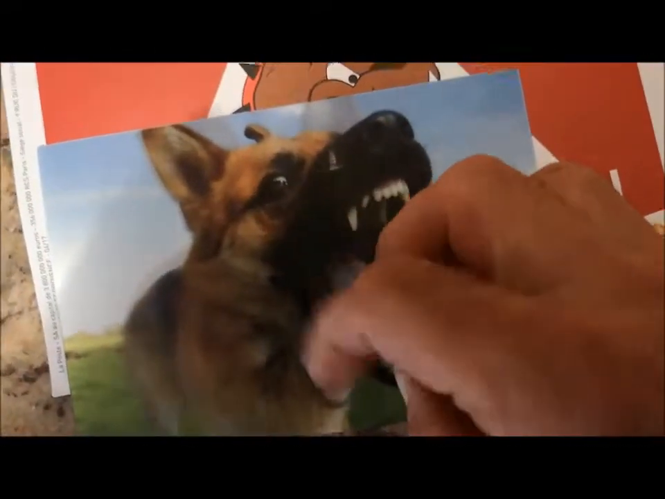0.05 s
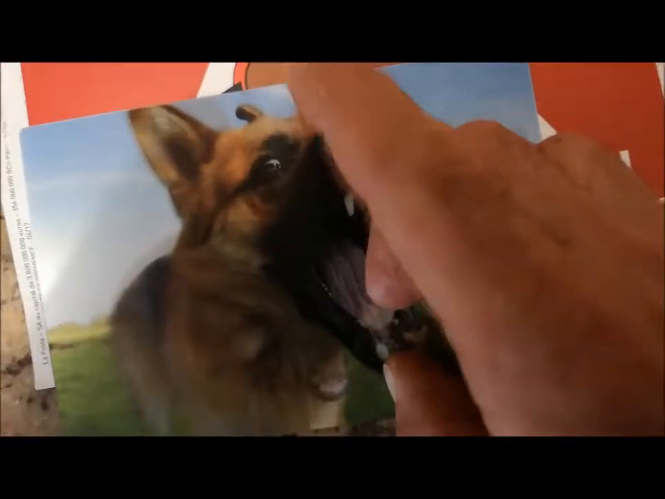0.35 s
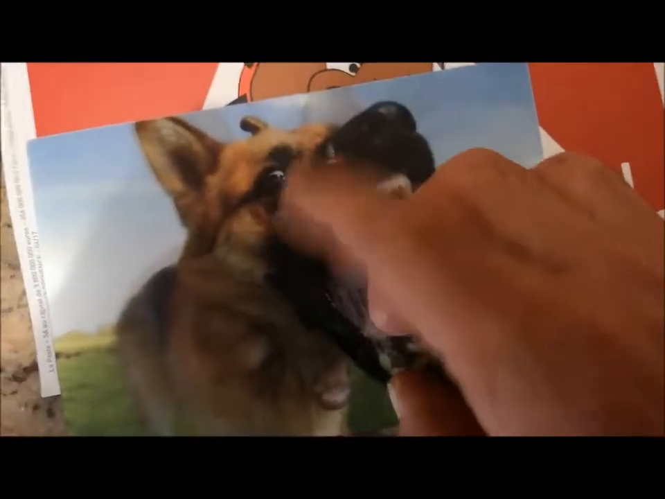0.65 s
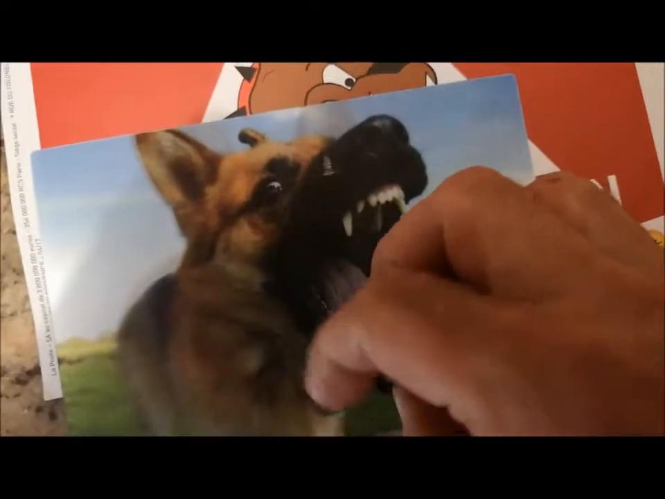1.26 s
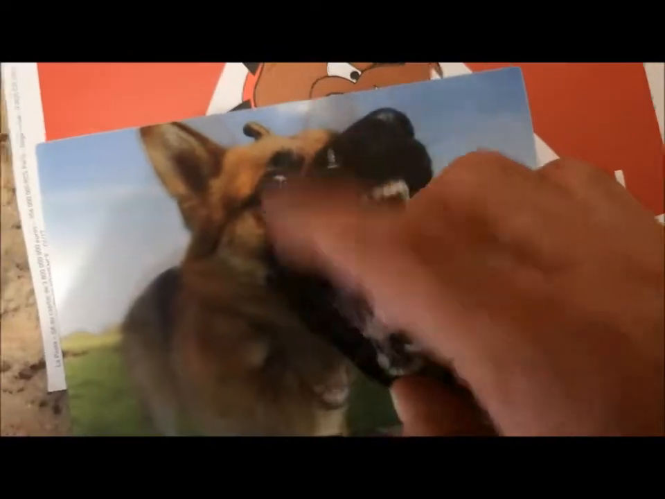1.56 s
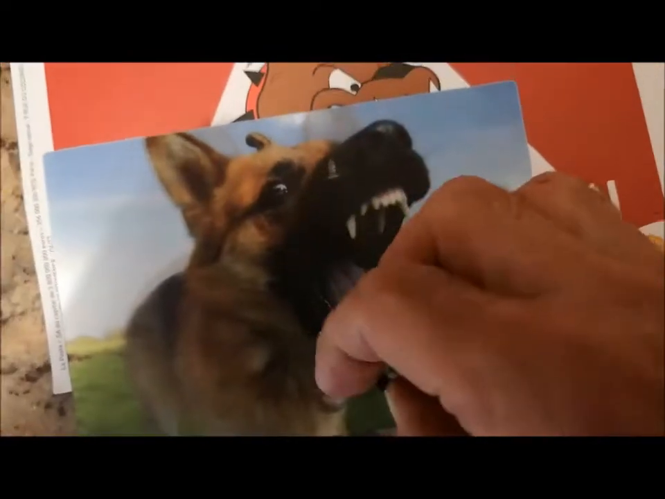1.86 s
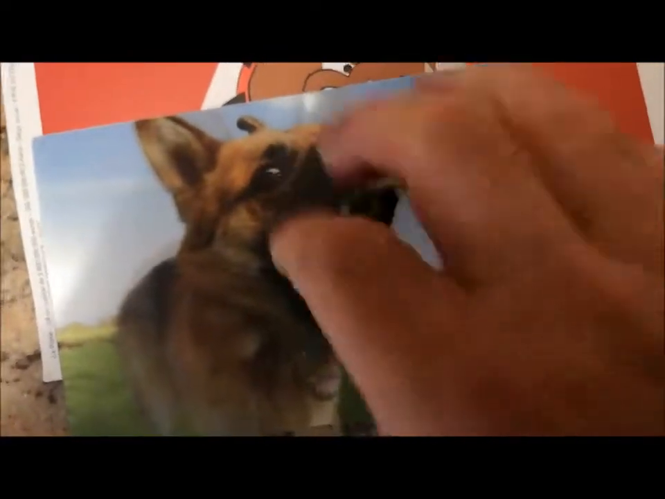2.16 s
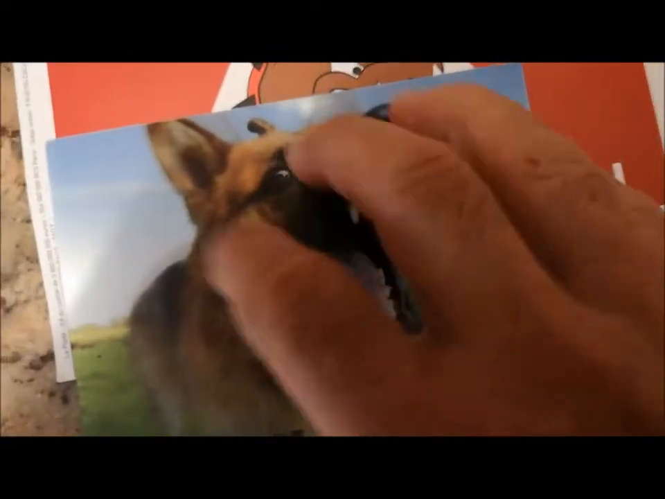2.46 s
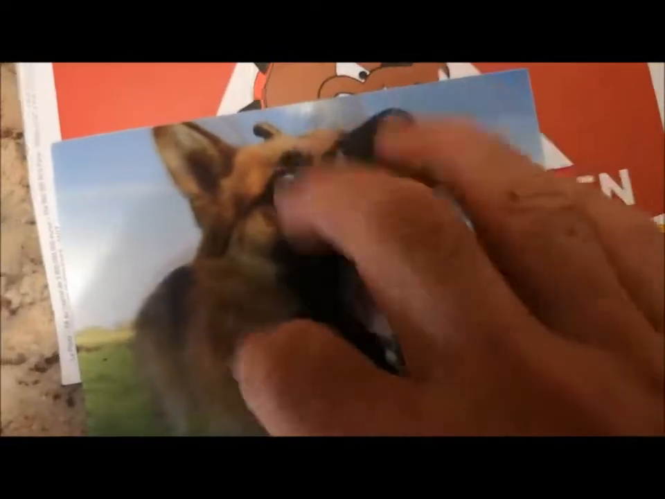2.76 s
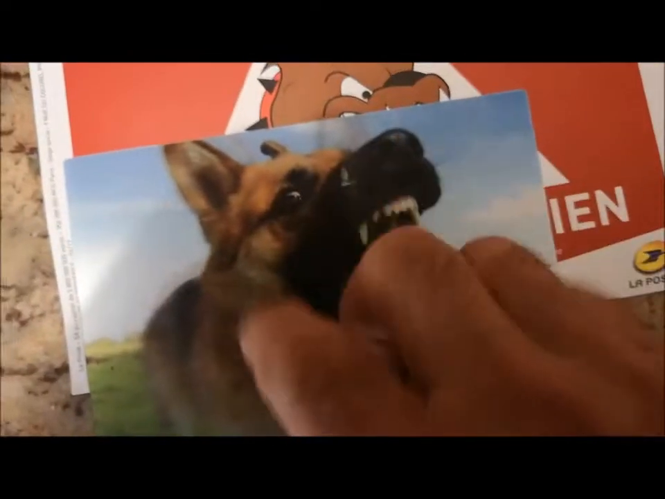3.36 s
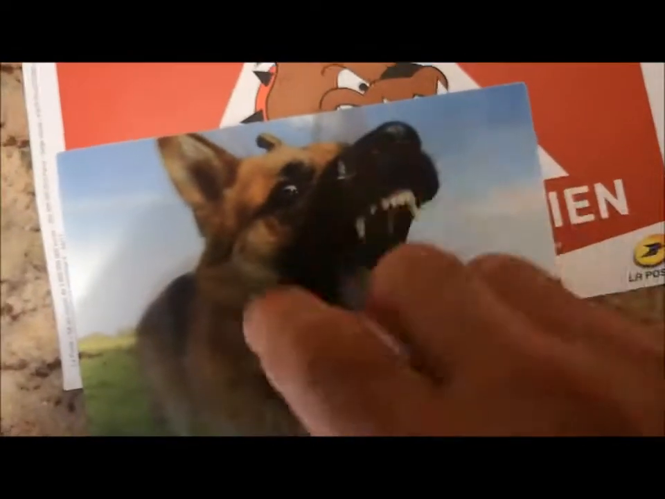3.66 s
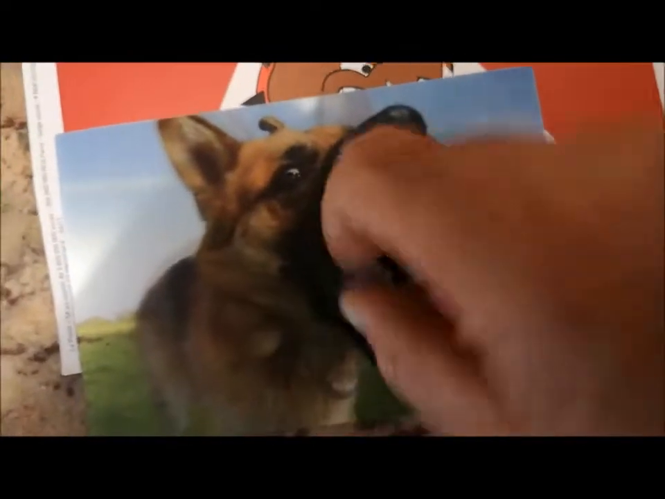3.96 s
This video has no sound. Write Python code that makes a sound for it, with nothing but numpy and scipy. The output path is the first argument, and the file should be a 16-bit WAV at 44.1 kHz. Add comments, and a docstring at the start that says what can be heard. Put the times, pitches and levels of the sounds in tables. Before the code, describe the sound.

Fingernails scratch a ribbed glossy card in quick, squeaky zips with light taps.

```python
"""Fingernails stroke a finely ribbed glossy postcard on a table, close to two microphones in a quiet room.
A nail lands with a tap and zips over the ribs. Its pitch is the number of ribs it crosses each second,
so a faster hand sounds higher. One finger scratches at first, then several claw together with more rasp.
The fingers thump the table as they land, and near the end the hand bumps it softly."""
import sys
import numpy as np
from scipy import signal
from scipy.fft import rfft, irfft, next_fast_len
from scipy.io import wavfile
from scipy.ndimage import uniform_filter1d, map_coordinates

SR = 44100
rng = np.random.default_rng(int(sys.argv[2]) if len(sys.argv) > 2 else 0)


def store_pcm(level_fs):
    """Save levels as 16-bit WAV."""
    pcm = np.round(np.clip(level_fs, -1, 1) * 32767).astype(np.int16)
    wavfile.write(sys.argv[1], SR, np.atleast_2d(pcm).T)


N = 176400  # 4 seconds
CLAW_FROM_S = 2  # one finger before this time, several after it
THUMP_RISE_S = 0.0021

# Nails landing on the card. Each row: start in seconds, level in dB.
LANDINGS = [(.036, -20), (0.4931, -19.5), (1.148, -18), (1.4559, -30.5), (1.8127, -21), (2.112, -44.5),
            (2.1338, -35), (2.2587, -33.5), (2.348, -23), (2.4286, -40), (2.4527, -30.5), (2.6, -35.5),
            (2.633, -31.5), (2.6869, -24.5), (2.9518, -28), (3.045, -24), (3.304, -29.5), (3.3491, -23),
            (3.4045, -24.5), (3.648, -21), (3.6876, -30.5), (3.9081, -27), (3.913, -14.5), (3.9165, -13.5)]
# The tone of a nail's click. Each row: frequency in Hz, level in dB.
CLICK_TONE = [(600, -33), (2400, 11.5), (4000, 5.5), (7800, 4.5), (11500, -26.5)]
# Fingertips dragging over the card. Each row: start in seconds, length in seconds, level in dB.
FINGERTIP_DRAGS = [(2.064, 0.032, -38), (2.146, 0.019, -28.5), (2.218, 0.025, -45.5), (2.258, 0.087, -38),
                   (2.405, 0.06, -39.5), (2.603, 0.098, -35), (2.739, 0.016, -28.5), (2.958, .11, -29.5),
                   (3.115, 0.019, -26), (3.312, 0.11, -34.5), (3.615, 0.095, -32), (3.772, 0.019, -25)]


def amp(db):
    """Turn decibels into a gain."""
    return 10 ** (np.asarray(db) / 20)


def fade(t, t60):
    """A fade that falls by 60 dB in t60 seconds."""
    return amp(-60 * t / t60)


def unit(x):
    """Scale a signal to an average power of 1."""
    return x / np.sqrt(np.mean(x ** 2) + 1e-20)


def along(points, hz):
    """Read between the rows of a frequency table, on a log scale."""
    freqs, values = np.transpose(points)
    return np.interp(np.log(hz + 1), np.log(freqs + 1), values)


def wobble(per_s):
    """A smooth curve through per_s random values a second."""
    return map_coordinates(rng.standard_normal(N // 8), [np.arange(N) * per_s / SR], mode="wrap")


def filtered(x, response):
    """Scale and delay each frequency as the response function says."""
    size = next_fast_len(N + SR // 2)
    return irfft(rfft(x, size) * response(np.fft.rfftfreq(size, 1 / SR)), size)[..., :N]


def coloured(x, tone, size=4096):
    """Shape a sound with a tone table, so that it rings only after each hit."""
    cepstrum = irfft(np.log(amp(along(tone, np.fft.rfftfreq(size, 1 / SR)))))
    cepstrum[1:size // 2] *= 2
    cepstrum[size // 2 + 1:] = 0
    return signal.fftconvolve(x, irfft(np.exp(rfft(cepstrum))))[:N]


def noise(tone):
    """Steady noise shaped by a tone table."""
    return unit(filtered(rng.standard_normal(N), lambda hz: amp(along(tone, hz))))


def add(track, start, sound):
    """Mix a sound into a track at a time in seconds."""
    part = track[round(start * SR):][:len(sound)]
    part += sound[:len(part)]


def pressure(drags):
    """Each drag presses down quickly, eases off and lets go."""
    t, total = np.arange(N) / SR, np.zeros(N)
    rise_s, fall_s, sag_db_per_s = 0.0086, 0.0065, 36
    for start, length, db in drags:
        press = np.clip((t - start) / rise_s, 0, 1)
        release = np.clip((start + length - t) / fall_s, 0, 1)
        total += amp(db - sag_db_per_s * np.abs(t - start)) * press * release
    return total


def room_air():
    """A faint, steady hiss, different in each microphone."""
    # The tone of the hiss. Each row: frequency in Hz, level in dB.
    hiss_tone = [(120, -13), (600, 9.5), (2500, 10), (15000, -7)]
    return amp(-72.5) * np.array([noise(hiss_tone), noise(hiss_tone)])


def nail_taps():
    """Each landing clicks and makes nail and card ring for a moment."""
    # The ringing notes. Each row: pitch in Hz, level in dB, seconds to fade by 60 dB.
    notes = [(2245, -14, 0.029), (2440, -6.5, 0.032)]
    taps, t = np.zeros(N), np.arange(SR // 20) / SR
    for start, db in LANDINGS:
        ring = sum(amp(level) * fade(t, t60) * np.sin(2 * np.pi * hz * rng.normal(1, .05) * t)
                   for hz, level, t60 in notes)
        click = amp(0.5) * fade(t, t60=0.018) * noise(CLICK_TONE)[:len(t)]
        add(taps, start, amp(db) * (ring + click))
    return taps


def table_thumps_and_rumble():
    """The table thumps and shudders as fingers land, and rumbles under the moving hand."""
    # The tone of the rumble. Each row: frequency in Hz, level in dB.
    rumble_tone = [(38, 3.5), (55, -7.5), (120, -6), (190, -17), (260, -15.5), (400, -34), (2000, -80)]
    table_hz, card_hz, limit_db = 94.4, 231, -19.5
    thumps, shudder, t = np.zeros(N), np.zeros(N), np.arange(SR // 2) / SR
    for start, db in LANDINGS:
        strength = amp(min(db, limit_db) - 13)  # a soft fingertip can only thump so hard
        push = strength * (1 - np.exp(-t / THUMP_RISE_S))
        turn = 2 * np.pi * rng.normal(1, 0.12) * t  # each thump is tuned a little differently
        thud = np.sin(table_hz * turn) + amp(-17) * np.sin(card_hz * turn)
        add(thumps, start, -2 * push * fade(t, t60=0.051) * thud)
        add(shudder, start, amp(-7.5) * push * fade(t, t60=0.51))
    hand = amp(-60.5) + amp(-16) * pressure(FINGERTIP_DRAGS)
    stereo_spread = amp(-11) * np.array([noise(rumble_tone), noise(rumble_tone)])
    return thumps + np.hypot(hand, shudder) * (noise(rumble_tone) + stereo_spread)


def nail_zips():
    """Nails buzz as they cross the ribs. Returns the buzz and its level over time."""
    # One slide of a nail per list. Each point: time in seconds, ribs crossed per second, level in dB.
    slides = [
        [(0.047, 3230, -14), (0.058, 2726, -5.5), (0.065, 4340, -13), (0.076, 3904, -35), (0.083, 4120, -16),
         (0.089, 3360, -23)],
        [(0.141, 1020, -35.5), (0.163, 1383, -25.5), (0.186, 1013, -34)],
        [(0.276, 1520, -28), (0.283, 2480, -19), (0.296, 3530, -28), (0.308, 3016, -22.5)],
        [(0.508, 3725, -22), (0.515, 3430, -7), (0.529, 4800, -12), (0.535, 4720, -22.5), (0.543, 3673, -15),
         (0.551, 3830, -22)],
        [(0.696, 1998, -27), (0.707, 4330, -31.5), (0.718, 4860, -12), (0.735, 2440, -33)],
        [(0.797, 1980, -23.5), (0.806, 2710, -18.5), (0.819, 4395, -24.5), (0.829, 3883, -9),
         (0.839, 4785, -24), (0.849, 4010, -16), (0.857, 2020, -29.5)],
        [(0.924, 2264, -19), (0.938, 5070, -32), (0.951, 5570, -10.5), (0.96, 2645, -46)],
        [(1.156, 4720, -43), (1.163, 4220, -10), (1.176, 5810, -21.5), (1.189, 5270, -17.5), (1.199, 2550, -37)],
        [(1.35, 1391, -34), (1.372, 4495, -32.5), (1.384, 5670, -13.5), (1.397, 3380, -40.5)],
        [(1.472, 2330, -14), (1.49, 4834, -27.5), (1.499, 4267, -10), (1.507, 4760, -20), (1.517, 3820, -20.5),
         (1.527, 1317, -49)],
        [(1.572, 1416, -32), (1.596, 5150, -34), (1.602, 5750, -11), (1.609, 4200, -31.5)],
        [(1.821, 3730, -24.5), (1.826, 3070, -12), (1.834, 3990, -22), (1.845, 3205, -7), (1.853, 3784, -25),
         (1.873, 2516, -22)],
        [(2.017, 1850, -21), (2.027, 4510, -34.5), (2.039, 6900, -22.5), (2.051, 3960, -25.5)],
        [(2.146, 1137, -32), (2.161, 1750, -22)],
        [(2.262, 3887, -29.5), (2.284, 4100, -23), (2.301, 6630, -14)],
        [(2.289, 1632, -14), (2.299, 2330, -11.5), (2.307, 3065, -17), (2.329, 1996, -23.5)],
        [(2.357, 1904, -10), (2.387, 1920, -21), (2.396, 1132, -5), (2.41, 690, -3)],
        [(2.61, 4230, -51), (2.615, 3950, -6.5), (2.624, 4250, -34.5), (2.635, 4050, -10.5), (2.656, 2260, -32)],
        [(2.702, 1288, -19.5), (2.742, 1977, -16.5), (2.746, 3270, -13.5), (2.753, 2020, -37)],
        [(2.817, 1138, -30), (2.83, 2446, -20.5), (2.85, 2535, -35.5)],
        [(2.965, 4395, -27.5), (2.973, 3820, -6), (2.979, 4153, -37.5), (2.99, 4696, -13), (2.998, 3497, -13.5),
         (3.012, 4334, -30), (3.022, 3734, -22), (3.03, 3250, -13)],
        [(3.074, 1114, -9), (3.093, 1717, -16.5), (3.117, 1722, -20), (3.122, 3026, -14.5),
         (3.131, 2200, -33.5)],
        [(3.183, 1920, -33.5), (3.199, 2940, -29.5)],
        [(3.319, 4260, -42.5), (3.326, 3684, -6.5), (3.333, 4370, -30.5), (3.346, 4210, -13.5),
         (3.364, 3564, -24.5)],
        [(3.349, 4070, -28), (3.357, 5176, -14), (3.368, 4820, -28.5)],
        [(3.37, 3316, -21.5), (3.39, 4080, -21.5), (3.403, 3635, -37)],
        [(3.435, 1331, -22), (3.449, 1714, -19), (3.478, 845, -22)],
        [(3.627, 5770, -37), (3.64, 4490, -13), (3.661, 3546, -34)],
        [(3.642, 5500, -23), (3.668, 4850, -19.5), (3.684, 4605, -30), (3.701, 3630, -25.5)],
        [(3.746, 1127, -15), (3.761, 2368, -21), (3.777, 3100, -27.5), (3.783, 3876, -20), (3.794, 1723, -39.5)],
        [(3.924, 2734, -54), (3.93, 3740, -21.5), (3.943, 2062, -37)],
    ]
    # How strongly card and table give off the buzz. Each row: frequency in Hz, level in dB.
    card_tone = [(300, -37.5), (700, -48.5), (1200, -22.5), (1850, -14.5), (2100, -12), (2700, -6.5),
                 (3150, -9.5), (3850, -8.5), (4250, -2.5), (5000, -11), (5600, -0.5), (6300, -8.5),
                 (7200, 3.5), (8000, 3), (9000, -3), (11000, -12.5), (15500, -8.5)]
    finger_db_per_octave, claw_db_per_octave = -15.5, -13.5  # clawing keeps stronger overtones
    finger_edge_db, claw_edge_db = -17.5, -13.5
    speed_jitter, edge_stray, flutter_db, flicker_db = 0.031, 0.25, 3, 3
    t, buzz, buzz_level = np.arange(N) / SR, np.zeros(N), np.zeros(N)
    harmonic = np.arange(1, 9)[:, None]
    flicker = (harmonic > 1) * flicker_db * np.array([wobble(per_s=315) for _ in harmonic])
    for is_edge in (False, True, True):  # the nail's tip, then two weaker edges that stray in pitch
        jitter = speed_jitter * wobble(per_s=1300)
        stray = is_edge * edge_stray * np.tanh(wobble(per_s=52))
        flutter = amp(flutter_db * wobble(per_s=630))  # uneven pressure
        for slide in slides:
            times, hz, db = np.transpose(slide)
            clawing = times[0] >= CLAW_FROM_S
            slope_db = claw_db_per_octave if clawing else finger_db_per_octave
            edge_db = claw_edge_db if clawing else finger_edge_db
            on = (t > times[0] - .002) & (t < times[-1] + .002)
            rib_rate = np.interp(t[on], times, hz)
            pitch = rib_rate * np.exp(jitter[on] + stray[on])
            soft_ends = signal.windows.tukey(on.sum(), .25)
            level = amp(np.interp(t[on], times, db) + is_edge * edge_db) * soft_ends
            phase = 2 * np.pi * np.cumsum(pitch) / SR
            gains = amp(slope_db * np.log2(harmonic) + flicker[:, on]) * (harmonic * pitch < SR / 2)
            buzz[on] += level * flutter[on] * np.sum(gains * np.sin(harmonic * phase), axis=0)
            if not is_edge:
                buzz_level[on] += level * amp(along(card_tone, rib_rate))
    return coloured(buzz, card_tone), buzz_level


def friction(buzz_level):
    """Sliding nails and fingertips make a grainy rasp; the fingertips also catch with tiny clicks."""
    # The tone of the rasp. Each row: frequency in Hz, level in dB.
    rasp_tone = [(200, -15), (700, -19.5), (2200, -2.5), (4500, 2.5), (6300, -2.5), (8000, 6.5),
                 (11500, -14), (15500, -25.5)]
    grain_db, patch_db, catches_per_s = 3.5, 7, 210
    drag = pressure(FINGERTIP_DRAGS)
    rough = rng.standard_normal(N) * amp(grain_db * wobble(per_s=440))
    spectrum = signal.stft(rough, nperseg=256)[2]
    # Random loud and soft patches across frequency and time make the tone flutter.
    patches = uniform_filter1d(rng.standard_normal(spectrum.shape), size=4, axis=0)
    patches = unit(uniform_filter1d(patches, size=3, axis=1))
    grains = signal.istft(spectrum * amp(patch_db * patches), nperseg=256)[1][:N]
    nail_level = amp(-35.5) * buzz_level ** 0.23  # the rasp grows much more slowly than the buzz
    rasp = (nail_level + .5 * drag) * unit(coloured(grains, rasp_tone))
    catches = (rng.random(N) < catches_per_s / SR) * rng.uniform(-0.75, 1, N)
    return rasp + amp(-11) * drag * unit(coloured(catches, CLICK_TONE))


def pad_brushes():
    """Soft finger pads brush the card with a duller hiss."""
    # The brush strokes. Each row: start in seconds, length in seconds, level in dB.
    strokes = [(2.06, 0.15, -50.5), (2.34, 0.11, -47)]
    # The tone of skin on card. Each row: frequency in Hz, level in dB.
    pad_tone = [(300, -21.5), (1300, -6), (14000, -29)]
    return pressure(strokes) * noise(pad_tone)


def hand_bumps():
    """The hand bumps the table, which hums briefly."""
    # The bumps. Each row: start in seconds, pitch in Hz, level in dB.
    bumps = [(3.478, 152, -46.5), (3.51, 79, -38), (3.918, 36.4, -47)]
    hums, t = np.zeros(N), np.arange(SR // 2) / SR
    rise = 1 - np.exp(-t / THUMP_RISE_S)
    for start, hz, db in bumps:
        add(hums, start, amp(db) * rise * fade(t, t60=0.3) * np.sin(2 * np.pi * hz * t))
    return hums


def right_microphone(card, lag_s=0.0006156):
    """The farther microphone hears the card later and partly blocked."""
    # Right side against left, for one finger. Each row: frequency in Hz, level in dB.
    finger_shade = [(500, -6.5), (2500, -23), (7500, -20.5), (10000, -12.5)]
    # The same for several fingers. Each row: frequency in Hz, level in dB.
    claw_shade = [(1000, -10.5), (2800, -25.5), (4200, -10), (7000, -19.5), (9500, -1.5)]
    one_finger = np.arange(N) / SR < CLAW_FROM_S
    shaded = np.where(one_finger, coloured(card, finger_shade), coloured(card, claw_shade))
    return filtered(shaded, lambda hz: np.exp(-2j * np.pi * hz * lag_s))


def room_echo(card, level_db=-15, delay_s=.004):
    """A small room adds a short wash of echoes, different at each microphone."""
    # How long the echoes last. Each row: frequency in Hz, seconds to fade by 60 dB.
    fade_times = [(1500, 0.24), (4500, 0.28), (14000, 0.19)]
    # The tone of the echoes. Each row: frequency in Hz, level in dB.
    echo_tone = [(1500, 3.5), (4500, -7), (14000, 4.5)]
    hz, t, spectrum = signal.stft(rng.standard_normal((2, SR // 2)), SR, nperseg=256)
    tail = signal.istft(spectrum * fade(t, along(fade_times, hz)[:, None]), SR, nperseg=256)[1]
    echo = signal.fftconvolve(card[None], tail / np.linalg.norm(tail[0]), axes=1)[:, :N]
    return filtered(echo, lambda f: amp(level_db + along(echo_tone, f)) * np.exp(-2j * np.pi * f * delay_s))


def scene():
    """Mix card, table and room, with the card nearer the left microphone."""
    buzz, buzz_level = nail_zips()
    card = buzz + friction(buzz_level) + pad_brushes() + nail_taps()
    direct = np.array([card, right_microphone(card)])
    return room_air() + direct + room_echo(card) + table_thumps_and_rumble() + hand_bumps()


def record(dry):
    """Cut away the very highest treble."""
    return filtered(dry, lambda hz: hz < 15450)


dry = scene()
out = record(dry)
store_pcm(out)
```